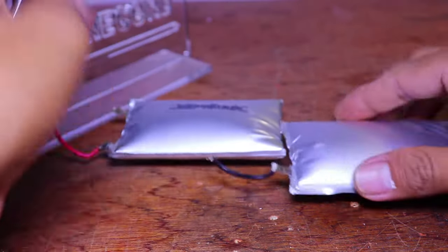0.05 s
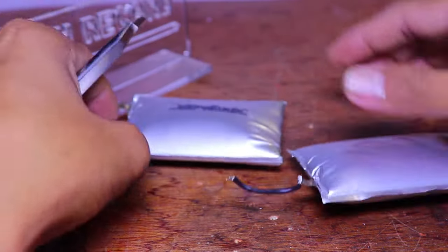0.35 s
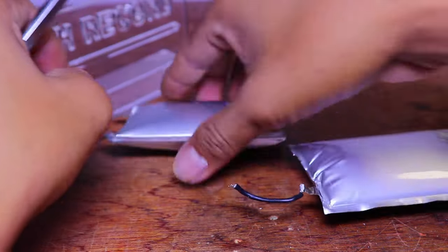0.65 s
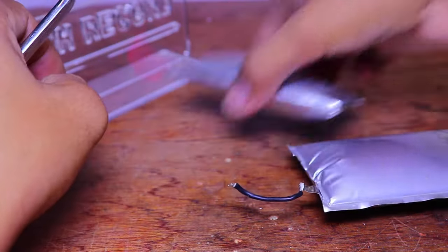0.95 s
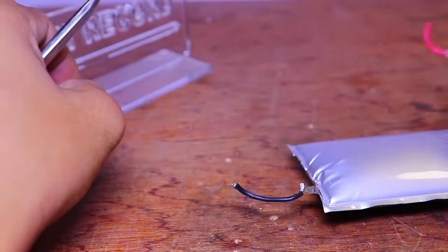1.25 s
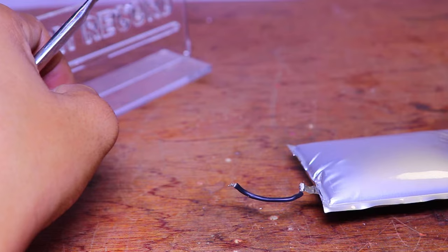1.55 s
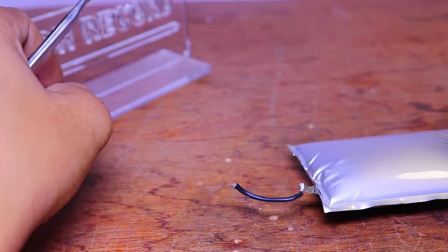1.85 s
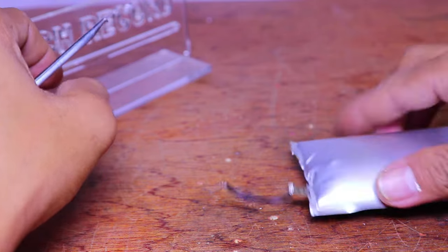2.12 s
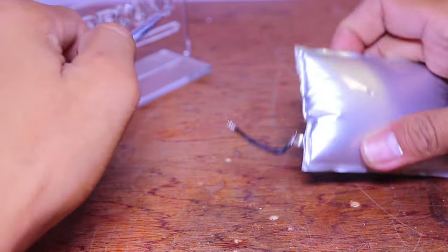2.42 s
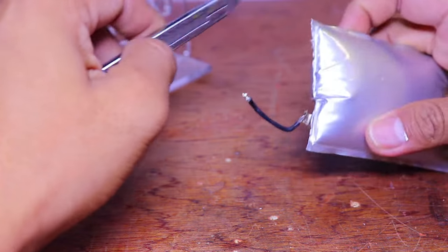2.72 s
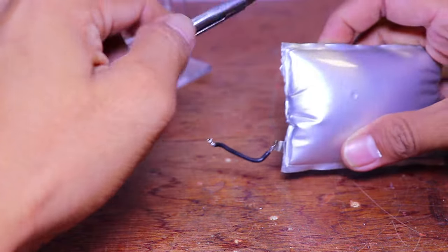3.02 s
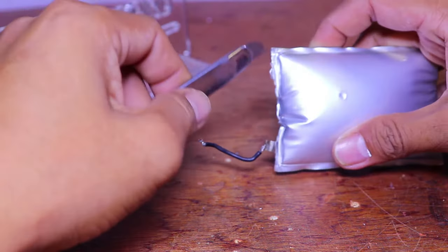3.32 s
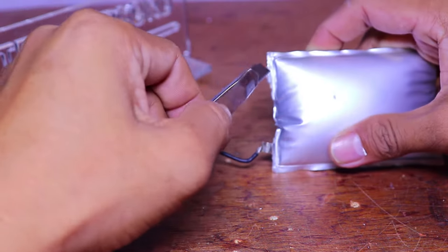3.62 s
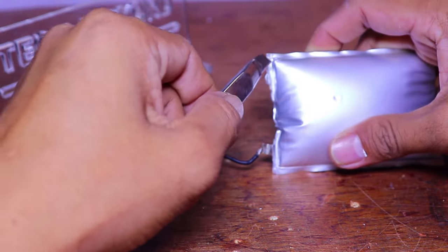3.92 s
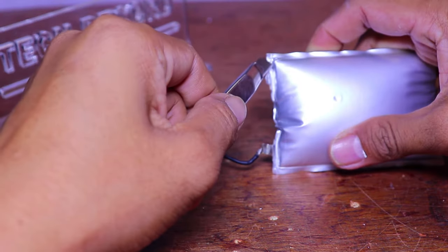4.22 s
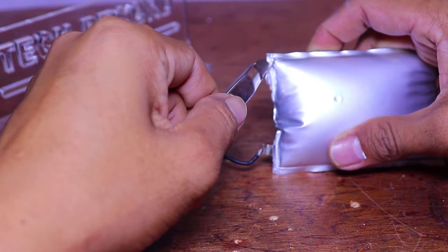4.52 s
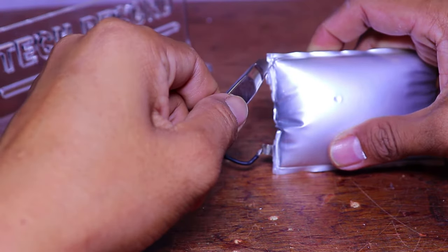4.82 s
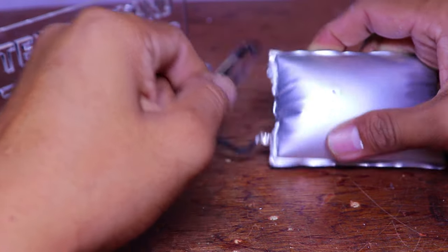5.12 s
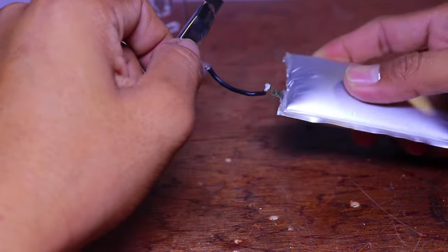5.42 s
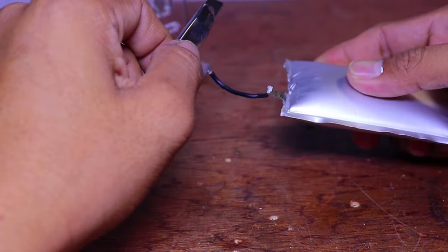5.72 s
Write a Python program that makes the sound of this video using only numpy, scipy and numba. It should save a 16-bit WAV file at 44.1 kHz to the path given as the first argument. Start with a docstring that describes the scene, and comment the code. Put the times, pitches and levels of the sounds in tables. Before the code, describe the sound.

Foil pouches crinkle, clack and slide on a wooden bench as hands handle them, over a faint hum.

```python
"""Foil crackles and hisses under fingers: two swollen pouch cells are handled on a wooden bench.
One is picked up, put down with a clatter and pushed aside; the other is dragged closer, lifted and
worked at with a blade. Foil snaps as it buckles, knocks ring the bench top, sliding things judder and
a hand bumps an acrylic stand. Close stereo in a small room, with faint air and mains hum underneath."""
import sys
import numpy as np
from scipy import signal
from scipy.fft import rfft, irfft
from scipy.io import wavfile
from numba import njit

SR = 44100
rng = np.random.default_rng(int(sys.argv[2]) if len(sys.argv) > 2 else 0)


def waveform_to_disk(signal):
    """Save audio, clipped to [-1, 1], as 16-bit WAV at the path in sys.argv[1]."""
    frames = np.transpose(np.atleast_2d(signal))
    scaled = np.clip(frames, -1, 1) * 32767
    samples = np.round(scaled).astype(np.int16)
    wavfile.write(sys.argv[1], SR, samples)


N = 262836
TIME = np.arange(N) / SR
HIT_SAMPLES = 8192
CRINKLE_RING_DB = 11  # buckled patch above the rest of the pouch

# Hit levels are 10 ms equivalents (see burst). Pan is left minus right.
# Foil buckling. Each row: start in s, level in dB, nominal length in s, ring in Hz, tilt in dB/octave,
# pan in dB.
FOIL_SNAPS = [(.0005, -20, 0.0043, 7250, -1.5, -3), (0.011, -26.5, 0.003, 4770, 12, 3),
              (.0997, -38.5, 0.002, 4370, 2, -4), (.117, -27.5, 0.0064, 8000, -1, -3),
              (0.122, -24.5, 0.0069, 6450, 7, -2), (.155, -31, 0.00091, 5490, 0, -1),
              (0.1672, -21, .0024, 7200, 7.5, 0), (.176, -24.5, 0.0022, 3040, 1, -2),
              (0.194, -32, 0.0046, 2750, -2, -2), (0.448, -39.5, 0.0026, 3900, -3, -12),
              (0.7576, -42, 0.0054, 3560, -3, 0), (1.0445, -40, .0077, 12000, 3, 1),
              (1.064, -23, 0.0012, 1360, 0.5, -1), (1.6713, -8.5, 0.0018, 3320, -0.5, -0.5),
              (1.894, -40.5, 0.0065, 4700, 3, -7), (2.524, -29, 0.0028, 6650, 2, -7),
              (2.5345, -28, 0.0026, 1600, 4, 3), (2.539, -25, 0.003, 6750, 12, -2),
              (2.783, -27.5, 0.0012, 6700, 4.5, -4), (3.1404, -28.5, .0087, 4550, 4.5, -3.5),
              (3.2439, -27.5, 0.0012, 4070, -0.5, -3), (3.2486, -30.5, 0.0038, 7500, 2, -1),
              (3.4042, -36.5, 0.0024, 3350, -1.5, -2), (3.4633, -37.5, .0038, 6250, -3.5, -4),
              (3.5028, -31, .0032, 6360, -4, -1.5), (3.596, -44, .002, 4870, -1, -4),
              (3.627, -38.5, 0.00095, 6160, -8, 1), (5.044, -39, 0.0039, 6640, -4, -3),
              (5.0617, -36.5, 0.0033, 6300, -4.5, -2)]
# Cell or blade striking something hard. Each row: start in s, level in dB, nominal length in s,
# ring in Hz, tilt in dB/octave, pan in dB, bench level before trim in dB.
HARD_KNOCKS = [(0.3623, -42.5, 0.0012, 3220, 4.5, -15, -48.5), (.475, -13.5, 0.0086, 8000, 2.5, -4.5, -28),
               (0.487, -29.5, 0.0081, 1320, -3, 1, -53), (1.2991, -19, 0.0024, 2350, -1.5, -3, -32.5),
               (1.312, -9, 0.0028, 3220, 1, -6.5, -29), (1.351, -24, 0.0034, 3200, -2.5, 0, -51),
               (1.404, -20, 0.0032, 1790, 0, -4, -33), (1.413, -16.5, 0.005, 2170, 0.5, -2, -49),
               (1.4239, -11.5, 0.0089, 2700, -0.5, -4, -21.5), (1.485, -20, 0.0021, 4000, -2, -2, -38),
               (1.52, -33, 0.004, 1390, -4, -4, -41), (1.805, -35, 0.0013, 1490, -7, -2, -43),
               (1.92, -30, 0.0042, 4300, -6.5, -1, -44), (2.16, -46.5, .0017, 5710, 8, 0, -52),
               (2.191, -37, 0.0042, 3850, 2, -8, -33), (2.202, -28.5, 0.0051, 2570, 1.5, -2.5, -48),
               (2.303, -31.5, 0.0046, 2880, -4, -3, -32.5), (2.316, -20.5, 0.012, 9700, 3.5, -2.5, -26.5),
               (2.98, -31, 0.0084, 1900, -2, -3, -33), (3.011, -31.5, 0.0068, 1760, -1, -2, -38.5),
               (3.108, -32.5, 0.002, 594, -2, -2, -33), (3.6824, -24, 0.0017, 7500, 2.5, -4.5, -40),
               (3.698, -23, 0.0036, 6100, 3.5, -5.5, -51), (5.1424, -15, 0.0015, 6600, 3, -4, -28)]
# Bench top modes. Each row: frequency in Hz, relative level in dB, T60 in s.
BENCH_MODES = [(196, -11, 0.11), (281, -3.5, 0.088), (348, 6, 0.026), (418, -2, 0.082), (485.4, 0, 0.053),
               (622, -3.5, 0.065), (730, -2, 0.069), (862, -5.5, 0.038), (990, 0.5, 0.073),
               (1227, -17.5, 0.085), (1481, -8, 0.11), (1636, -17, 0.11), (1807, -15.5, 0.2),
               (1970, -6, 0.088), (2220, -30, 0.11)]
# Pouch foil response. Each row: frequency in Hz, relative gain in dB.
FOIL_SPECTRUM = [(300, -28.5), (1150, -21.5), (2000, -13.5), (2700, -17), (3500, -10), (4600, -4),
                 (7500, -4), (10500, -10.5), (13300, -6.5), (16000, -29)]


def crinkles():
    """Bright snaps of buckling foil."""
    out = np.zeros((2, N))
    for s, db, length_s, ring_hz, tilt_db, pan_db in FOIL_SNAPS:
        sound = snap(FOIL_SPECTRUM, length_s, ring_hz, CRINKLE_RING_DB, tilt_db,
                     ring_octaves=0.39, ripple_db=5.0)
        add(out, s, burst(sound, db) * sides(pan_db))
    return out


def knocks(ring_db=7.5, bench_trim_db=-1):
    """The struck corner of a cell clacks and the bench rings under it."""
    # Cell response. Each row: frequency in Hz, relative gain in dB.
    cell_spectrum = [(250, -27.5), (700, -18), (1100, -4.5), (1550, 3.5), (2600, -2.5), (4500, -1.5),
                     (6000, -4), (8000, -9.5), (10500, -15.5), (13500, -19), (16000, -38)]
    out = np.zeros((2, N))
    for s, db, length_s, ring_hz, tilt_db, pan_db, bench_db in HARD_KNOCKS:
        clack = snap(cell_spectrum, length_s, ring_hz, ring_db, tilt_db, ring_octaves=0.38, ripple_db=3)
        thud = strike(BENCH_MODES, rise_s=0.0011)
        add(out, s, burst(clack, db) * sides(pan_db) + burst(thud, bench_db + bench_trim_db))
    return out


def snap(body, length_s, ring_hz, ring_db, tilt_db, ring_octaves=0.26, ripple_db=6.5):
    """A few ms of tiny slips, heard through the body and the ring of the patch that gave way."""
    fall_s, spiky_db, ripple_hz = .0014, 6, 300
    t, hz = np.arange(HIT_SAMPLES) / SR, freqs(HIT_SAMPLES)
    push = np.minimum(0.32 + 2 * t / length_s, 1) * np.exp(-np.maximum(t - 1.11 * length_s, 0) / fall_s)
    slips = rng.standard_normal((3, HIT_SAMPLES)) * undb(spiky_db * rng.standard_normal(HIT_SAMPLES))
    ring = ring_db * np.exp(-.5 * (np.log2(hz / ring_hz) / ring_octaves) ** 2)
    # each snap has its own crowd of small, quickly damped modes
    crowd = ripple_db * np.interp(hz / ripple_hz, np.arange(512), rng.standard_normal(512))
    tilt = tilt_db * np.log2(np.maximum(hz, 1000) / 5000)
    response = minimum_phase(along(body, hz) + ring + crowd + tilt)
    return irfft(pair(rfft(slips * push), treble_apart(hz)) * response)


def strike(modes, rise_s, scatter_db=3.5, detune=0.01, spread_hz=1100):
    """A plate rings; each strike scatters the strength, tuning and phase of its modes."""
    t = np.arange(HIT_SAMPLES) / SR
    hz, db, t60_s = np.transpose(modes)[:, :, None]
    size, tune, phase, offset = rng.standard_normal((4, len(modes), 1))
    swing = undb(db + scatter_db * size) * decay(t, t60_s)
    angle = 2 * np.pi * (hz * (1 + detune * tune) * t + phase)
    skew = offset * hz / spread_hz  # shorter waves reach the two sides less in step
    ring = np.array([np.sum(swing * np.sin(angle + side * skew), axis=0) for side in (.5, -.5)])
    return ring * (1 - np.exp(-t / rise_s))


def slides(hiss_trim_db=-2, scrape_trim_db=-4, rumble_trim_db=-2, judder_db=2.5, judder_hz=170):
    """Foil hisses through a resonance that moves with the grip; wood scrapes and shakes the bench."""
    # Friction spectra of foil, wood and bench. Each row: frequency in Hz, relative gain in dB.
    hiss_spectrum = [(1200, -4), (2400, 3.5), (3500, -2.5), (5000, -4), (7500, -3), (10000, -4.5),
                     (13500, -7.5), (16000, -18)]
    scrape_spectrum = [(350, -17), (700, -5.5), (1100, -3), (1600, 0.5), (2400, -6.5), (3500, -3.5),
                       (7000, -37.5)]
    rumble_spectrum = [(60, -46), (130, 9.5), (200, -9), (300, 5), (450, -6), (650, -7), (1300, -43)]
    hiss_gain, skin_hz = foil_motion()
    scrape_gain, rumble_gain = wood_motion()
    hiss = colour(friction(grain_db=2.5, apart=0.84), hiss_spectrum)
    # the taut skin radiates little below its first resonance
    edge_hz = np.clip(0.99 * skin_hz, 2000, 12000)
    hiss = unit(np.array([resonant_highpass(side, edge_hz, damping=.42) for side in hiss]))
    scrape = colour(through_bench(friction(grain_db=7.5, apart=0.26)), scrape_spectrum)
    rumble = colour(through_bench(friction(grain_db=8.0, apart=0.22)), rumble_spectrum)
    surface = hiss * hiss_gain * undb(hiss_trim_db) + scrape * scrape_gain * undb(scrape_trim_db)
    return surface * undb(judder_db * walk(judder_hz)) + rumble * rumble_gain * undb(rumble_trim_db)


def foil_motion(strain_s=0.0115, settle_s=0.02, crease_db=-12, crease_hz=4800, sag_octaves=.2):
    """Stereo gain and power-weighted resonance of finger rubs and creases rustling around each snap."""
    # Fingers on foil. Each row: start in s, length in s, relative level in dB,
    # change over the stroke in dB, nominal skin resonance in Hz, pan in dB.
    rubs = [(.04, 0.11, -49, 4, 4800, 0), (0.15, .15, -30, -10.5, 3640, -3),
            (0.423, 0.068, -42.5, 10.5, 4400, -2), (0.666, .025, -49, 0.5, 4080, -2),
            (0.836, 0.08, -34, -3, 4260, -0.5), (1.316, 0.092, -40, -6, 3000, 0),
            (1.41, 0.088, -26.5, -14, 3600, -4), (1.524, 0.16, -30.5, -2, 4700, -5.5),
            (1.692, 0.14, -35, 1.5, 4540, -5), (2.165, 0.053, -34, -3, 3600, -2),
            (2.25, 0.052, -36, 4, 3520, -2), (2.314, 0.12, -25.5, -5, 4200, -3),
            (2.642, 0.086, -40, -16, 3400, -0.5), (3.204, 0.14, -48, -2, 4900, -2),
            (3.35, 0.23, -58, -9, 4360, -2), (5.16, 0.11, -42.5, -4, 4280, -2),
            (5.255, 0.094, -45.5, -1.5, 4800, -2), (5.347, 0.056, -50, -2.5, 4420, -2),
            (5.478, 0.064, -51, 0, 4600, -2)]
    crease = np.minimum(TIME[:SR] / strain_s, 1) * jolt(settle_s)
    moves = [(s - strain_s, undb(db + crease_db) * crease, crease_hz, pan_db)
             for s, db, *_, pan_db in FOIL_SNAPS]
    for s, length_s, db, change_db, hz, pan_db in rubs:
        gain, progress = stroke(length_s, change_db)
        slackening_hz = hz * 2 ** (-sag_octaves * progress)
        moves.append((s, undb(db) * gain, slackening_hz, pan_db))
    power, weighted_hz = np.zeros((2, N)), np.zeros((1, N))
    for s, gain, hz, pan_db in moves:
        add(power, s, (gain * sides(pan_db)) ** 2)
        add(weighted_hz, s, (gain ** 2 * hz)[None])
    return np.sqrt(power), weighted_hz[0] / (power.mean(axis=0) + 1e-18)


def wood_motion(rest_scrape_db=-75, rest_rumble_db=-55.5, skid_scrape_db=-12.5, skid_rumble_db=-15):
    """Scrape and rumble gains from resting hands, drags and the skid after each knock."""
    # Cell dragged over wood. Each row: start in s, length in s, relative scrape in dB,
    # change over the stroke in dB, relative rumble in dB, pan in dB.
    drags = [(0.907, 0.019, -39, 2, -52, 1), (1.355, 0.047, -33.5, 3.5, -56, 0),
             (1.44, 0.085, -31.5, -4, -40, 7), (1.5, 0.24, -27.5, -23, -35.5, -2),
             (1.794, .06, -36, -3.5, -47, -2), (2.198, 0.027, -39.5, 1.5, -40, 0),
             (2.321, 0.17, -30.5, -4.5, -32, -1), (2.631, 0.064, -35.5, -17, -36, 2),
             (2.949, 0.056, -39, 4, -47, 1)]
    scrape_power = np.full((2, N), undb(rest_scrape_db) ** 2)
    rumble_power = np.full((1, N), undb(rest_rumble_db) ** 2)
    for s, length_s, scrape_db, change_db, rumble_db, pan_db in drags:
        gain, _ = stroke(length_s, change_db)
        add(scrape_power, s, (undb(scrape_db) * gain * sides(pan_db)) ** 2)
        add(rumble_power, s, (undb(rumble_db) * gain[None]) ** 2)
    for s, *_, bench_db in HARD_KNOCKS:
        skid = undb(bench_db) * jolt(decay_s=0.061)[None]
        add(scrape_power, s, (undb(skid_scrape_db) * skid) ** 2)
        add(rumble_power, s, (undb(skid_rumble_db) * skid) ** 2)
    return np.sqrt(scrape_power), np.sqrt(rumble_power)


def stroke(length_s, change_db, attack_s=0.027, release_s=0.023):
    """Gain of a stroke that gathers speed, swells or fades and stops; its progress from 0 to 1."""
    t = TIME[:SR]
    progress = np.clip(t / length_s, 0, 1)
    release = np.exp(-np.maximum(t - length_s, 0) / release_s)
    return np.minimum(t / attack_s, 1) * undb(change_db * progress) * release, progress


def jolt(decay_s):
    """Gain of a sudden motion dying away."""
    return np.exp(-TIME[:SR] / decay_s)


def friction(grain_db, apart):
    """Dense tiny catches of uneven size between two surfaces."""
    return pair(rng.standard_normal((3, N)), apart) * undb(grain_db * rng.standard_normal(N))


def through_bench(x, floor_db=-8, damping_hz=14):
    """Rubbing drives the bench modes, widened by a resting hand."""
    hz = freqs(N)
    peaks = sum(peak(hz, mode_hz, damping_hz + np.log(1000) / (2 * np.pi * t60_s))
                for mode_hz, _, t60_s in BENCH_MODES)
    return irfft(rfft(x) * np.sqrt(peaks + undb(2 * floor_db)), N)


def thumps(rise_s=0.0025, t60_s=0.074, overtone_ratio=1.3, overtone_db=-8):
    """Soft, long pushes move only the lowest modes under the hand."""
    # Hand and pouch landing. Each row: start in s, level in dB, pitch in Hz.
    landings = [(1.324, -36, 130), (1.433, -28.5, 184), (1.457, -33, 166.6), (1.547, -31, 139),
                (1.555, -32, 110), (2.174, -38, 122), (2.307, -27.5, 202), (2.32, -28, 255),
                (2.477, -38, 220), (2.502, -36.5, 222), (2.94, -41, 195), (2.984, -41, 193),
                (3.111, -38, 212), (3.41, -43.5, 192)]
    out, t = np.zeros((2, N)), np.arange(HIT_SAMPLES) / SR
    envelope = (1 - np.exp(-t / rise_s)) * decay(t, t60_s)
    for s, db, hz in landings:
        angle = 2 * np.pi * hz * t
        swing = np.sin(angle) + undb(overtone_db) * np.sin(overtone_ratio * angle)
        add(out, s, burst(swing[None] * envelope, db))
    return out


def stand_bumps(scuff_db=-4, scuff_s=0.0063):
    """The light stand rocks and settles: each time a hollow knock and a dull scuff of its foot."""
    # Stand contacts. Each row: start in s, level in dB, contact time in s.
    contacts = [(3.6988, -32.5, 0.00083), (3.795, -36.5, 0.0023), (3.885, -44, 0.00088), (3.916, -53, .003)]
    # Stand modes. Each row: frequency in Hz, relative level in dB, T60 in s.
    stand_modes = [(338, -18, 0.1), (376, 4.5, 0.067), (700, -14, 0.068), (774, 3.5, 0.041),
                   (1057, -11, 0.058), (1483, -10, 0.063), (1990, -14, 0.035), (2460, -21, .03)]
    # Foot scuff. Each row: frequency in Hz, relative gain in dB.
    scuff_spectrum = [(150, -1), (350, -5), (800, -3), (1200, -6), (2200, -6), (3500, -22), (7000, -38)]
    out = np.zeros((2, N))
    for s, db, contact_s in contacts:
        scuff = snap(scuff_spectrum, scuff_s, ring_hz=770, ring_db=-3, tilt_db=0.5)
        add(out, s, burst(strike(stand_modes, contact_s), db) + burst(scuff, db + scuff_db))
    return out


def grip_ticks(gap_s=0.031, level_db=-48, spread_db=2, length_s=0.0017, ring_hz=4800):
    """Small creases tick at random under a tightening grip."""
    # Grips. Each row: start in s, end in s.
    grips = [(.2, 0.39), (2.659, 2.84), (3.53, 3.67)]
    out = np.zeros((2, N))
    for start_s, end_s in grips:
        gaps, sizes, tunes = rng.standard_normal((8, 3)).T
        times_s = start_s + gap_s * np.cumsum(np.exp(0.37 * gaps))
        for s, size, tune in zip(times_s, sizes, tunes):
            tick_hz = ring_hz * np.exp(0.29 * tune)
            tick = snap(FOIL_SPECTRUM, length_s, tick_hz, CRINKLE_RING_DB, tilt_db=-8.5)
            if s < end_s:
                add(out, s, burst(tick, level_db + spread_db * size))
    return out


def room(x, near_db=-11, near_s=0.014, far_db=-15, gap_s=0.0016):
    """Quick reflections off the bench and its clutter, then the room's short tail."""
    # Room decay. Each row: band centre in Hz, T60 in s.
    decay_bands = [(150, 0.42), (400, 0.2), (1000, 0.16), (2800, 0.22), (7000, .16), (14000, 0.082)]
    size = 16384
    t, hz = np.arange(size) / SR, freqs(size)
    onset = np.clip(t / gap_s - 1, 0, 1)
    near, far = (stereo_noise(size, treble_apart(hz)) for _ in range(2))
    centres_hz, t60s = np.transpose(decay_bands)
    tail = 0
    for weights, t60_s in zip(np.eye(len(decay_bands)), t60s):
        band = irfft(rfft(far) * along(np.c_[centres_hz, weights], hz))
        tail = tail + band * decay(t, t60_s)
    early = near * onset * np.exp(-t / near_s)
    response = undb(near_db) * unit(early) + undb(far_db) * unit(tail * onset)
    return signal.fftconvolve(x, response / np.sqrt(size), axes=1)[:, :N]


def room_air(level_db=-50, sway_db=1.0, bass_apart_hz=18):
    """Gently wavering air noise; treble and the lowest rumble differ between the sides."""
    # Air noise. Each row: frequency in Hz, relative gain in dB.
    air_spectrum = [(15, -53), (25, -17), (64, -14.5), (82, -5), (102, -3.5), (134, -10), (200, -5.5),
                    (229, -11), (405, -13.5), (463, -13.5), (531, -15), (1190, -16), (4250, -25),
                    (7510, -28.5), (16000, -38)]
    hz = freqs(N)
    noise = stereo_noise(N, treble_apart(hz) + bass_apart_hz / hz)
    return colour(noise, air_spectrum) * undb(level_db + sway_db * walk(rate_hz=4.08))


def thin_hiss(centre_hz=7410, half_width_hz=370, level_db=-65.5):
    """A steady, narrow band of high noise."""
    band = rfft(rng.standard_normal((2, N))) * peak(freqs(N), centre_hz, half_width_hz)
    return undb(level_db) * unit(irfft(band, N))


def mains_hum(hz=100, sway_db=.7):
    """A faint mains tone that fades and swells back."""
    # Hum contour. Each row: time in s, level in dB.
    contour = [(0, -54), (.9, -52), (1.5, -65), (2, -67), (3.3, -71), (4.6, -74), (5.3, -56.5),
               (5.95, -54.5)]
    level_db = np.interp(TIME, *np.transpose(contour)) + sway_db * walk(rate_hz=5.4)
    return np.sqrt(2) * np.sin(2 * np.pi * hz * TIME) * undb(level_db)


def undb(db):
    """Decibels to gain."""
    return 10 ** (np.asarray(db) / 20)


def unit(x):
    """Scale to rms 1."""
    return x / np.sqrt(np.mean(x ** 2) + 1e-18)


def burst(x, db):
    """Scale a short sound to the energy of 10 ms at this level."""
    return x * undb(db) * np.sqrt(.01 * SR / np.mean(np.sum(x ** 2, axis=-1)))


def decay(t, t60_s):
    """Gain falling 60 dB in t60_s."""
    return np.exp(-np.log(1000) * t / t60_s)


def peak(hz, centre_hz, half_width_hz):
    """Resonance curve of height 1."""
    return 1 / (1 + ((hz - centre_hz) / half_width_hz) ** 2)


def freqs(size):
    """FFT bin frequencies, floored at 1 Hz."""
    return np.maximum(np.arange(size // 2 + 1) * SR / size, 1)


def along(points, hz):
    """Read (Hz, value) points on a log-frequency axis."""
    point_hz, value = np.transpose(points)
    return np.interp(np.log(hz), np.log(point_hz), value)


def colour(x, spectrum):
    """Filter a full-length sound by (Hz, dB) points; rms 1."""
    return unit(irfft(rfft(x) * undb(along(spectrum, freqs(N))), N))


def minimum_phase(db):
    """Response of a body with these gains that rings only after it is struck."""
    cepstrum = irfft(np.log(undb(db)))
    half = len(cepstrum) // 2
    cepstrum[1:half] *= 2
    cepstrum[half + 1:] = 0
    return np.exp(rfft(cepstrum))


@njit
def resonant_highpass(x, hz, damping):
    """State-variable high-pass with a peak at its moving edge."""
    y, band_state, low_state = np.empty(len(x)), 0., 0.
    for i in range(len(x)):
        g = np.tan(np.pi * hz[i] / SR)
        band = (band_state + g * (x[i] - low_state)) / (1 + g * (g + damping))
        y[i] = x[i] - damping * band - (low_state + g * band)
        band_state, low_state = 2 * band - band_state, low_state + 2 * g * band
    return y


def walk(rate_hz):
    """Random wander with a spread near 1."""
    knots = rng.standard_normal(4096)
    return np.interp(TIME * rate_hz, np.arange(len(knots)), knots)


def sides(pan_db):
    """Left and right gains of constant total power."""
    gains = undb(np.array([[.5], [-.5]]) * pan_db)
    return gains / np.sqrt(np.mean(gains ** 2, axis=0))


def pair(three, apart):
    """Stereo from common, left and right signals; apart is the unshared part of the power."""
    own = np.clip(apart, 0, 1)
    return np.sqrt(1 - own) * three[0] + np.sqrt(own) * three[1:]


def treble_apart(hz, crossover_hz=700):
    """Unshared part of the power, rising with frequency."""
    return hz / (hz + crossover_hz)


def stereo_noise(size, apart):
    """White noise, partly unshared in each frequency bin."""
    return irfft(pair(rfft(rng.standard_normal((3, size))), apart), size)


def add(out, s, sound):
    """Mix a short sound in at s seconds."""
    start = max(int(s * SR), 0)
    out[:, start:start + sound.shape[-1]] += sound[:, :N - start]


def scene():
    """The handling, its reflections and the quiet behind it."""
    handling = crinkles() + knocks() + stand_bumps() + thumps() + slides() + grip_ticks()
    return handling + room(handling) + room_air() + thin_hiss() + mains_hum()


def record(dry):
    """Clip at full scale, then low-pass at 16.2 kHz."""
    lowpass = signal.ellip(8, .2, 70, 16200, fs=SR, output="sos")
    return signal.sosfilt(lowpass, np.clip(dry, -1, 1))


dry = scene()
out = record(dry)
waveform_to_disk(out)
```